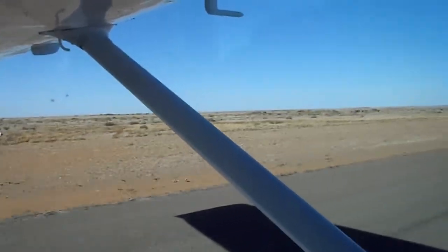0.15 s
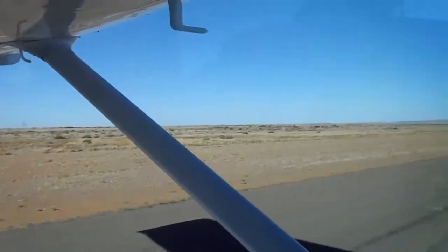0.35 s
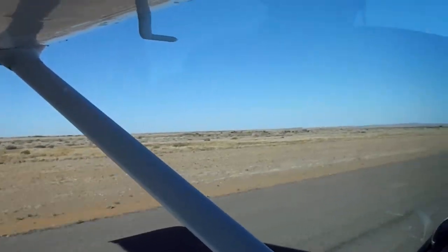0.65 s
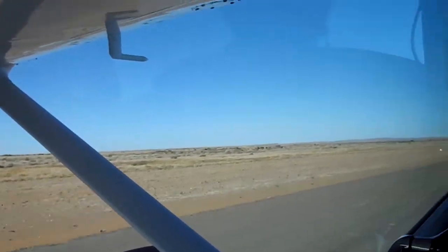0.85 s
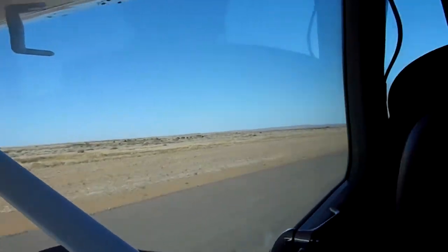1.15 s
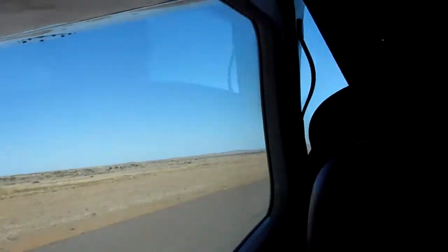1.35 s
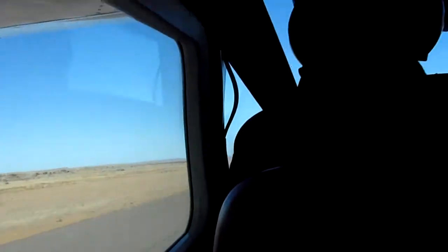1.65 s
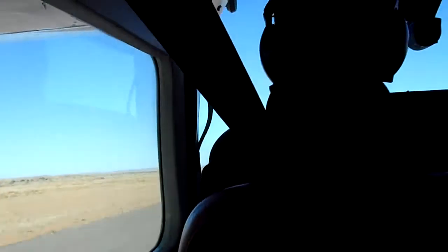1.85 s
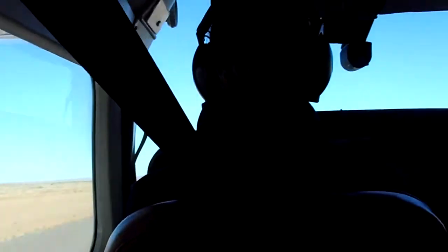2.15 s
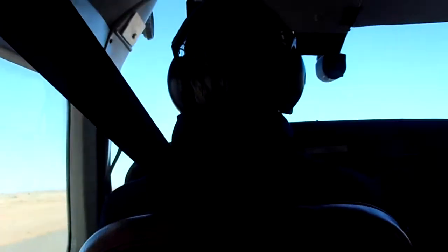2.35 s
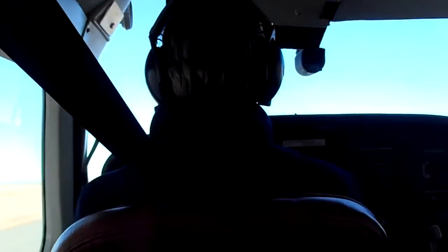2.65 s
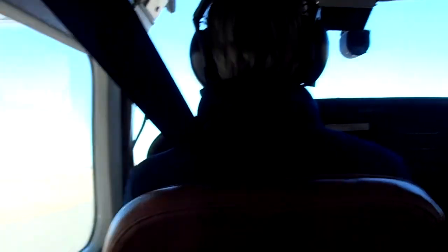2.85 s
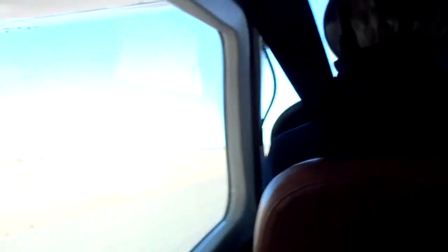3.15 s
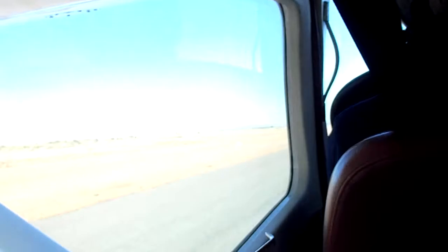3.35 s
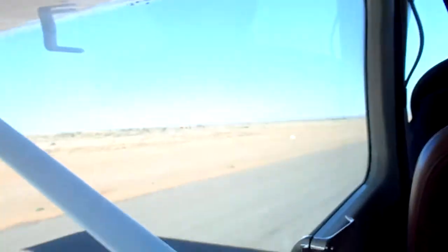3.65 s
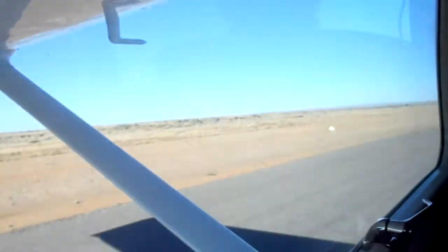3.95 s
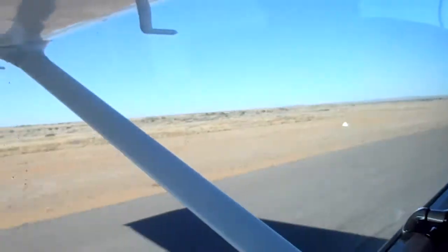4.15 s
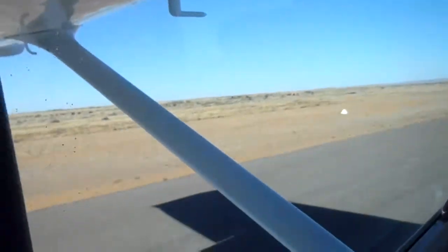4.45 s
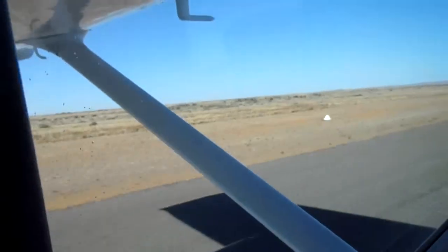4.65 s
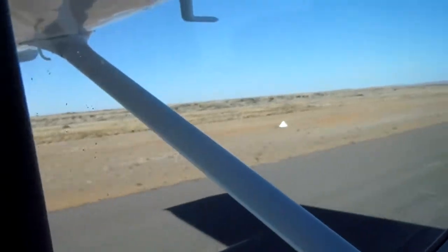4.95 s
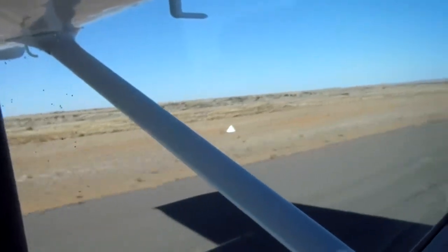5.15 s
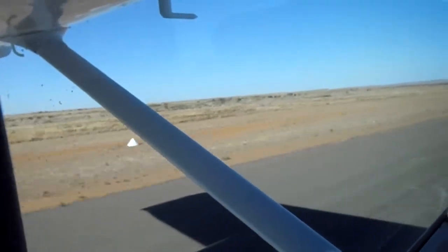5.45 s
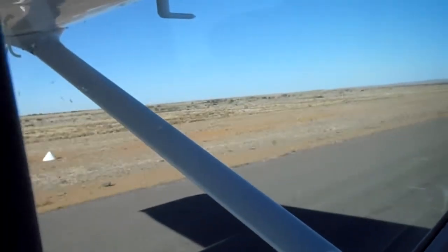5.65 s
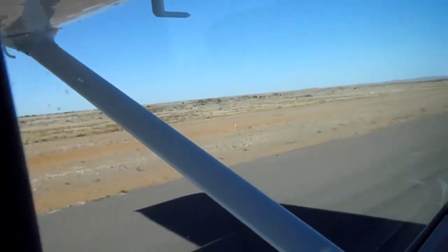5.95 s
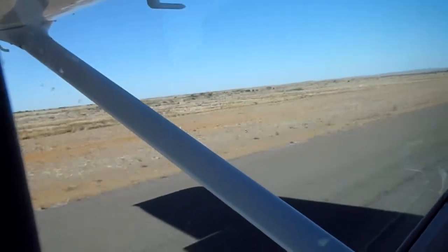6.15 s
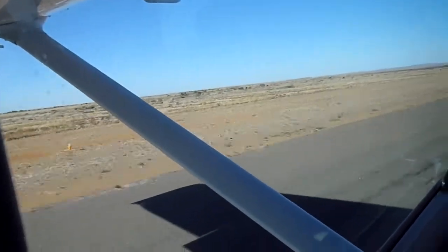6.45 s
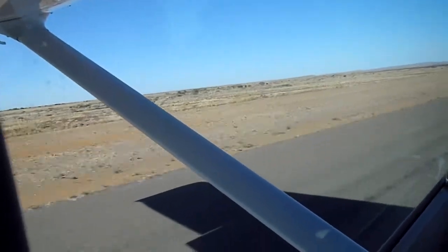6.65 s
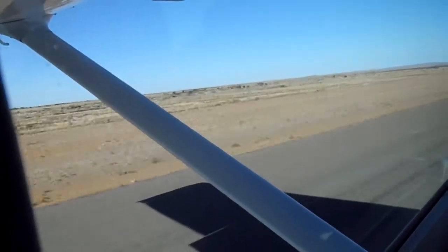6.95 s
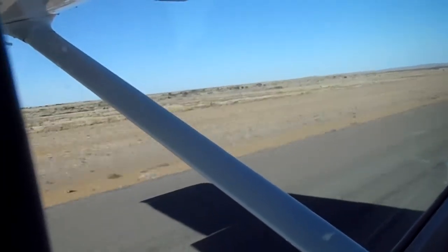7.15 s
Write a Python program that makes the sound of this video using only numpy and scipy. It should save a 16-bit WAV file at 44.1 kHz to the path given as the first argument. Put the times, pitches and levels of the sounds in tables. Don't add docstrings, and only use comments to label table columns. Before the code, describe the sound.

Loud steady buzzing drone of a light aircraft speeding down a runway, heard from the cabin, with rumble, wind hiss, faint rattles and crackling distortion.

```python
import sys
import numpy as np
from scipy import signal
from scipy.io import wavfile
from scipy.ndimage import uniform_filter1d

SR = 44100
rng = np.random.default_rng(int(sys.argv[2]) if len(sys.argv) > 2 else 0)


def master(y):
    cut = np.clip(np.atleast_2d(y).T, -1, 1)
    pcm = np.round(cut * 32767)
    wavfile.write(sys.argv[1], SR, pcm.astype(np.int16))


def linear_from_db(decibels):
    return 10 ** (np.asarray(decibels, float) / 20)


N = 322812

# (time [s], firing rate [Hz], firing tone rms [dB])
ENGINE_SPEED = [(0.0, 111.0, -14.7), (0.2, 111.4, -13.7), (0.5, 112.9, -11.7), (0.8, 114.8, -11.8),
                (1.2, 116.6, -12.2), (2.0, 119.5, -13.0), (3.2, 124.6, -14.0), (3.9, 127.3, -15.1),
                (4.4, 128.6, -15.9), (4.8, 129.7, -18.2), (5.4, 130.8, -19.4), (6.2, 131.5, -19.0),
                (6.45, 132.4, -22.0), (6.8, 134.1, -24.0), (7.1, 135.1, -22.2), (7.32, 135.3, -21.2)]
# (time [s], share facing front [0-1])
FACING_FRONT = [
    (0, 0.09),
    (1.1, 0),
    (1.9, .95),
    (2.75, .95),
    (3.3, 0.5),
    (3.9, 0),
    (7.32, 0.08),
]
# (frequency [Hz], rms [dB])
CABIN_RESPONSE = [(165, -25.5), (203, -33.5), (222, -42.5), (258, -37), (275, -34.5), (366, -48.5),
                  (377, -37.5), (405, -32)]
# (frequency [Hz], rms [dB])
UNEVEN_TONES = [(20, -58), (70, -39), (110, -44), (280, -52), (450, -51), (615, -50.5), (665, -60),
                (1600, -62)]
UNEVEN_ACCENTS = {15: 1.9, 20: 6.0, 21: 2.8, 23: 3.5, 24: 2.5, 26: -2, 28: 4.1, 29: -2, 30: 5.0, 32: -8, 33:
                  6.0, 36: 5.1}

# (frequency [Hz], density [dB/Hz])
RUMBLE_SPECTRUM = [(12, -28), (28, -2), (70, -2), (150, 0.5), (210, -3), (290, -12.5), (500, -53.5),
                   (1500, -99)]
# (frequency [Hz], density [dB/Hz])
BOOM_SIDE_SPECTRUM = [(200, -19.5), (290, 0), (390, 3), (480, 1.5), (620, -2), (720, -5), (1000, -18),
                      (1500, -32.5), (4000, -99)]
# (frequency [Hz], density [dB/Hz])
BOOM_FRONT_SPECTRUM = [(200, -35), (290, -8), (390, 7), (500, -2), (620, -3.5), (720, -11), (1000, -14),
                       (1500, -24.5), (4000, -99)]
# (frequency [Hz], density [dB/Hz])
AIRFLOW_SPECTRUM = [(600, -23), (900, -13.5), (1400, -12), (1800, -11.5), (2080, -16.5), (2550, -6),
                    (2800, -8), (3100, -4), (3450, -11), (3700, -13.5), (4300, -27.5), (4800, -31.5),
                    (5600, -40), (9000, -99)]
# (frequency [Hz], density [dB/Hz])
BUZZ_SPECTRUM = [(2500, -40), (4000, 6), (4800, 9), (5500, 6), (6200, 2), (7200, 0), (11000, -1),
                 (12200, -5), (14200, -2)]

# (start [dB], gain with speed [dB/s], change facing front [dB], change in mid swing [dB])
RUMBLE_LEVEL = (-29.5, 0.69, -2, -0.3)
BOOM_LEVEL = (-37, 0.89, -7, -0.8)
AIRFLOW_LEVEL = (-37.0, 0.77, -1.35, -0.1)
WHISTLE_LEVEL = (-44, 0.08, -2, 5)
BUZZ_LEVEL = (-57, 0.24, -3.5, 1.8)
RING_LEVEL = (-66, -.5, 8.5, -2.5)

# (first crest [s], crests [count], length [ms])
OVERLOAD_RUNS = [(0.3169, 2, .8), (0.3201, 1, 1.5), (0.3881, 1, .6), (0.4232, 1, 1.1), (0.4766, 2, .8),
                 (0.5296, 2, .85), (0.5433, 2, .6), (0.5823, 2, .7), (0.6355, 2, .6), (0.6663, 1, .5),
                 (0.6880, 4, .45), (0.7928, 5, .8), (0.8586, 1, .5), (0.9104, 1, .6), (0.9148, 4, .6),
                 (0.9453, 2, .55), (1.0662, 1, .55), (1.1043, 1, .6), (1.1907, 2, .9), (1.2373, 1, .6),
                 (1.3234, 1, .55), (1.3614, 1, 1.2), (1.4298, 1, .9), (1.5653, 1, .5), (1.7176, 1, 1.0),
                 (1.7812, 1, .8), (1.9324, 1, .4)]
# (time [s], peak [dB])
LIMIT_TICKS = [(0.5961, -28), (0.7541, -28), (0.8234, -31), (1.001, -28), (1.0185, -27), (1.031, -29),
               (1.1006, -28), (1.2723, -30), (1.2847, -30), (1.4256, -28), (1.4806, -28), (1.4932, -28),
               (2.0198, -28), (2.3532, -28), (3.1765, -28), (3.2447, -25), (3.3247, -26), (3.4129, -27),
               (3.4167, -28), (3.5597, -27), (3.6075, -28), (3.679, -26)]

CYLINDERS = 6
UNEVEN_GAIN_DB_PER_S, UNEVEN_HIDDEN_DB = .5, -3.5
WHISTLE_HZ, WHISTLE_WIDTH_HZ = 3110, 190
RING_HZ, RING_T60_S = (4600, 4750, 4880), .016
CHATTER_HZ, CHATTER_DB, SNAP_DB = 7150, -30, -28
FULL_MS, LENGTH_SPREAD = .6, .5
TICK_MS = .06
BAND_EDGE_HZ = 14230
LEAK_DB = -31
FULL_SCALE_S, FULL_SCALE_DB = 3.3773, -25


def evened(x):
    return x / np.sqrt(np.mean(x ** 2) + 1e-20)


def columns(rows):
    time_s, *values = np.transpose(rows)
    return [np.interp(np.arange(N) / SR, time_s, v) for v in values]


def read(points, hz):
    points_hz, value = np.transpose(points)
    return np.interp(np.log(hz + 1), np.log(points_hz + 1), value)


def wander(top_hz):
    t = np.arange(0, N / SR + .02, .01)
    hz = np.geomspace(.1, top_hz, num=16)
    sines = np.sin(2 * np.pi * (t[:, None] * hz + rng.random(16)))
    slow = (sines / np.sqrt(hz)).sum(1)
    return np.interp(np.arange(N) / SR, t, evened(slow))


def noise(spectrum, patchy_db, size, count=8):
    hz = np.fft.rfftfreq(size, 1 / SR)
    real, imag, patches = rng.standard_normal((4 * N // size + 5, len(hz), 3)).T
    patches = uniform_filter1d(patches, size=10, axis=0)
    patches = evened(uniform_filter1d(patches, size=count, axis=1))
    level = read(spectrum, hz)[:, None] + patchy_db * patches
    frames = (real + 1j * imag) * linear_from_db(level)
    return evened(signal.istft(frames, nperseg=size, noverlap=3 * size // 4)[1][:N])


def facing_front():
    return np.clip(columns(FACING_FRONT)[0], 0, 1)


def level_db(start_db, gain_db_per_s, front_db, swing_db):
    front = facing_front()
    swing = 4 * front * (1 - front)
    return start_db + gain_db_per_s * np.arange(N) / SR + front_db * front + swing_db * swing


def cycles():
    firing_hz = columns(ENGINE_SPEED)[0] * (1 + 0.001545 * wander(8))
    return np.cumsum(firing_hz) / SR / CYLINDERS


def tone(turns, multiple, db):
    return np.sqrt(2) * linear_from_db(db) * np.cos(2 * np.pi * (multiple * turns + rng.random()))


def engine(turns):
    firing_hz, firing_db = columns(ENGINE_SPEED)
    out = tone(turns, CYLINDERS, firing_db + 0.46 * wander(12))
    for k in (9, 12, 18):
        cabin_db = read(CABIN_RESPONSE, k * firing_hz / CYLINDERS)
        out += tone(turns, k, cabin_db + .6 * wander(9.2) + 1.2 * wander(2.5))
    gain_db = UNEVEN_GAIN_DB_PER_S * (np.arange(N) - N / 2) / SR
    hidden_db = UNEVEN_HIDDEN_DB * columns(FACING_FRONT)[0]
    for k in sorted(set(range(1, 74)) - {6, 7, 9, 11, 12, 13, 17, 18}):
        db = np.repeat(read(UNEVEN_TONES, k * firing_hz[::100] / CYLINDERS), 100)[:N]
        db = db + gain_db + hidden_db * (20 < k < 30)
        out += tone(turns, k, db + UNEVEN_ACCENTS.get(k, 0) + 4.0 * wander(4.0))
    return out


def rumble():
    return linear_from_db(level_db(*RUMBLE_LEVEL)) * noise(RUMBLE_SPECTRUM, 1.7, size=4096)


def panel_boom():
    front = facing_front()
    side_boom = np.sqrt(1 - front) * noise(BOOM_SIDE_SPECTRUM, 0.4, size=2048)
    front_boom = np.sqrt(front) * noise(BOOM_FRONT_SPECTRUM, 0.68, size=2048)
    return linear_from_db(level_db(*BOOM_LEVEL)) * (side_boom + front_boom)


def airflow(turns):
    shape = ((-10.0, -99), (-1, -13.5), (0, -1), (0, -15.0), (24, -99))  # (widths off centre, dB)
    cavity = [(WHISTLE_HZ + k * WHISTLE_WIDTH_HZ, db) for k, db in shape]
    rush = linear_from_db(level_db(*AIRFLOW_LEVEL)) * noise(AIRFLOW_SPECTRUM, 1.3, size=512)
    whistle_db = level_db(*WHISTLE_LEVEL) + 0.57 * wander(1.0)
    whistle = linear_from_db(whistle_db) * noise(cavity, 0.9, size=1024, count=16)
    throb = np.exp(.12 * np.cos(2 * np.pi * turns))
    return (rush + whistle) * throb


def trim(turns):
    late = uniform_filter1d(rng.standard_normal(N), size=400) * 2.6
    at = np.flatnonzero(np.diff(np.floor(np.maximum.accumulate(3 * turns + late))))
    harder = np.arange(len(at)) % 3 == 0
    knocks = np.zeros(N)
    knocks[at] = linear_from_db(3.5 * rng.standard_normal(len(at)) + 3.5 * harder)
    t = np.arange(1500) / SR
    burst = signal.oaconvolve(knocks, (1 - np.exp(-t / 0.00051)) * np.exp(-t / 0.0028))[:N]
    buzz = evened(noise(BUZZ_SPECTRUM, 1.0, size=512, count=50) * (1.3 + evened(burst)))
    decay = linear_from_db(-60 * t / RING_T60_S) * (1 - np.exp(-t / 0.00052))
    ring = np.zeros(N)
    for hz in RING_HZ:
        struck = knocks * rng.uniform(-1.2, 1, N)
        ring += signal.oaconvolve(struck, decay * np.sin(2 * np.pi * hz * t))[:N]
    ring_db = level_db(*RING_LEVEL) + 4.6 * wander(3.4)
    return linear_from_db(level_db(*BUZZ_LEVEL)) * buzz + linear_from_db(ring_db) * evened(ring)


def snap(t, ms):
    enter = np.sinc((t + .0004 * ms) * SR * .7)
    leave = np.sinc((t - .0004 * ms) * SR * .5)
    return enter + .45 * leave


def overloads():
    out = np.zeros(N)
    t = np.arange(-64, 65) / SR
    firing_hz = columns(ENGINE_SPEED)[0]
    for first_s, count, run_ms in OVERLOAD_RUNS:
        for k in range(count):
            s = first_s + 2 * k / firing_hz[round(first_s * SR)]
            turn, pull, luck = rng.random(3)
            ms = run_ms * (1 + LENGTH_SPREAD * (luck - .5) * (k > 0))
            phase = 2 * np.pi * (CHATTER_HZ * (1 + 0.17 * (pull - .5)) * t + turn)
            envelope = np.exp(-(t / (.00045 * ms)) ** 4)
            chatter = (np.cos(phase) + .45 * np.cos(2 * phase)) * envelope
            chatter_gain = linear_from_db(CHATTER_DB - 1.6 * luck) * min(ms / FULL_MS, 1)
            at = round(s * SR) - 64
            out[at:at + len(t)] += chatter_gain * chatter + linear_from_db(SNAP_DB) * snap(t, ms)
    for s, db in LIMIT_TICKS:
        at = round(s * SR) - 64
        out[at:at + len(t)] += linear_from_db(db) * snap(t, TICK_MS * (.5 + rng.random()))
    return out


def scene():
    turns = cycles()
    return (engine(turns) + rumble() + panel_boom() + airflow(turns) + trim(turns))[None]


def top_cut(x):
    return signal.sosfilt(signal.butter(12, 15830, fs=SR, output="sos"), x)


def record(dry):
    faults = overloads()
    band_limit = signal.firwin(511, BAND_EDGE_HZ, window=("kaiser", 9), fs=SR)
    limited = signal.oaconvolve(dry + faults, band_limit[None], "same")
    converter_snap = linear_from_db(FULL_SCALE_DB) * (np.arange(N) == round(FULL_SCALE_S * SR))
    mix = limited + linear_from_db(LEAK_DB) * faults + converter_snap
    return top_cut(mix)


dry = scene()
out = record(dry)
master(out)
```